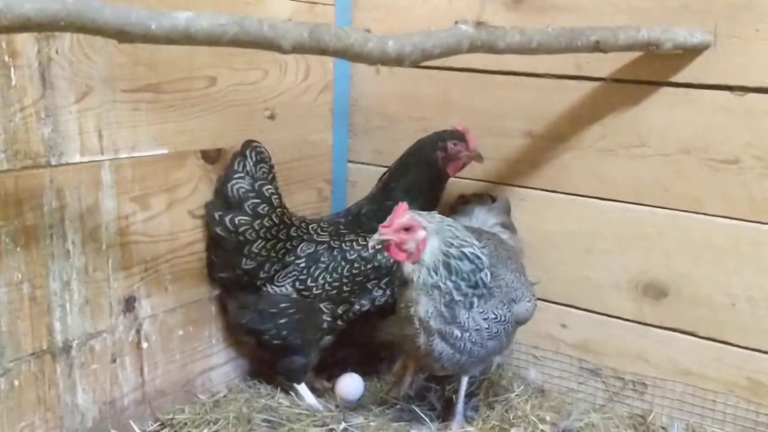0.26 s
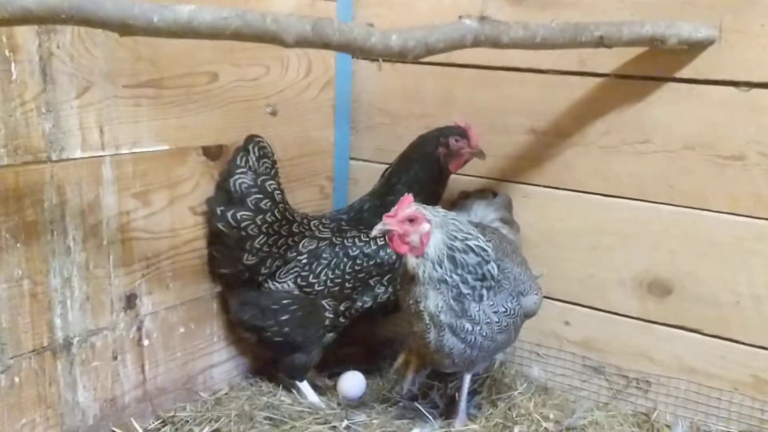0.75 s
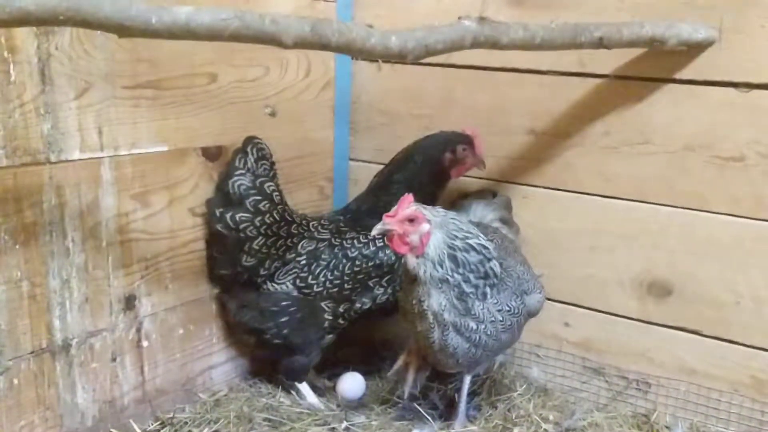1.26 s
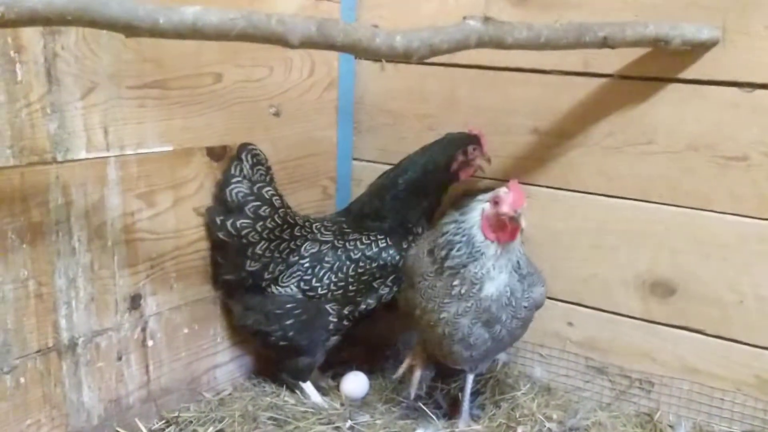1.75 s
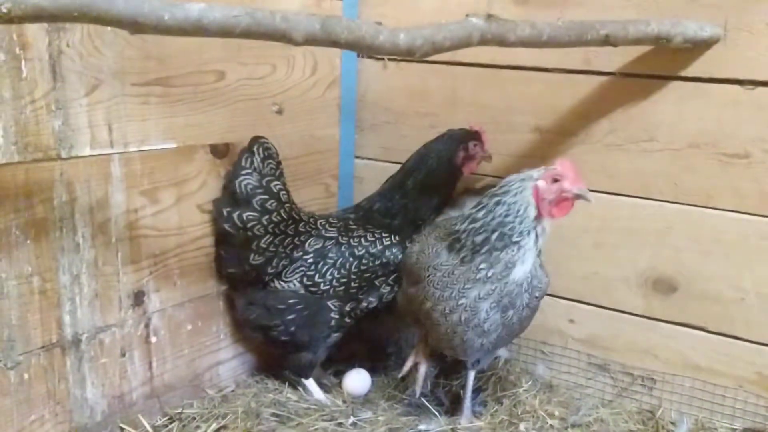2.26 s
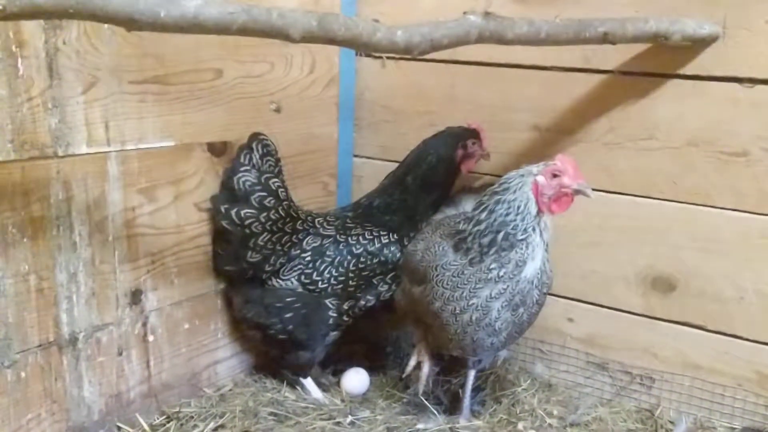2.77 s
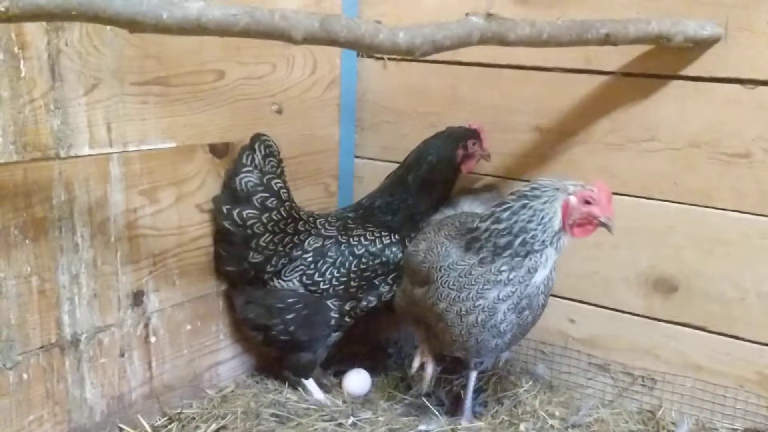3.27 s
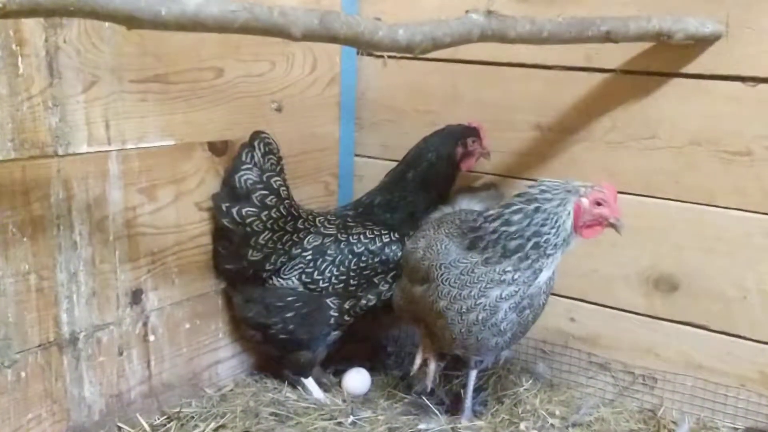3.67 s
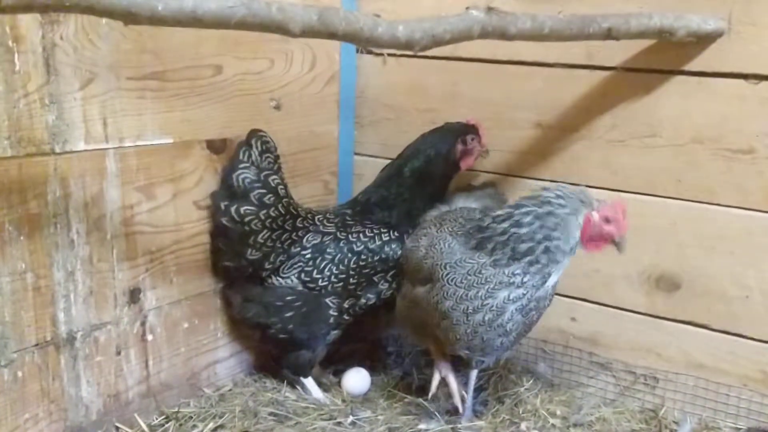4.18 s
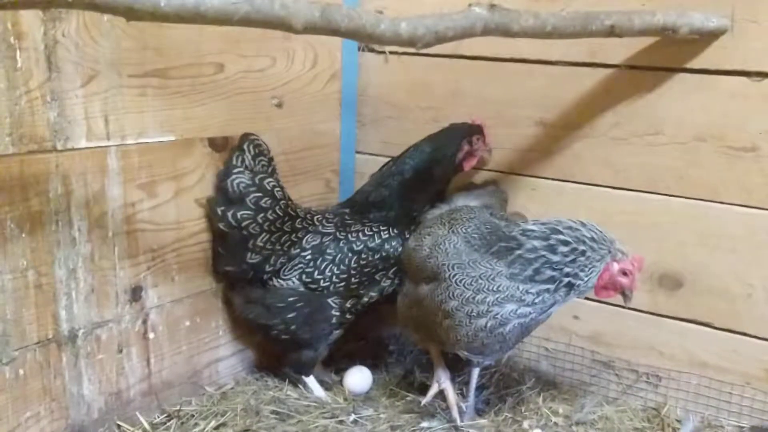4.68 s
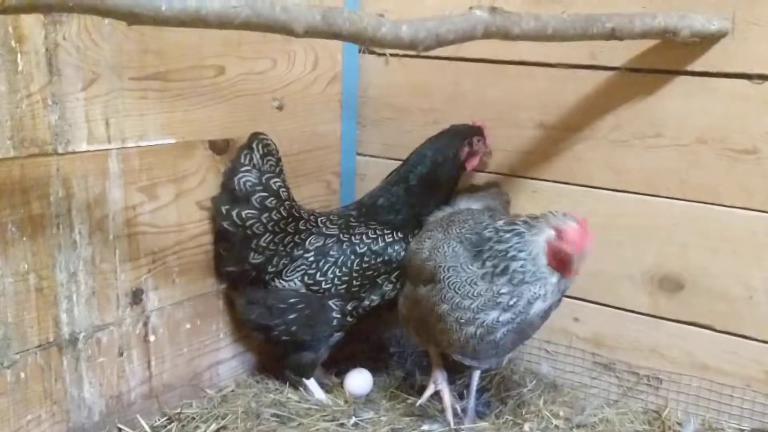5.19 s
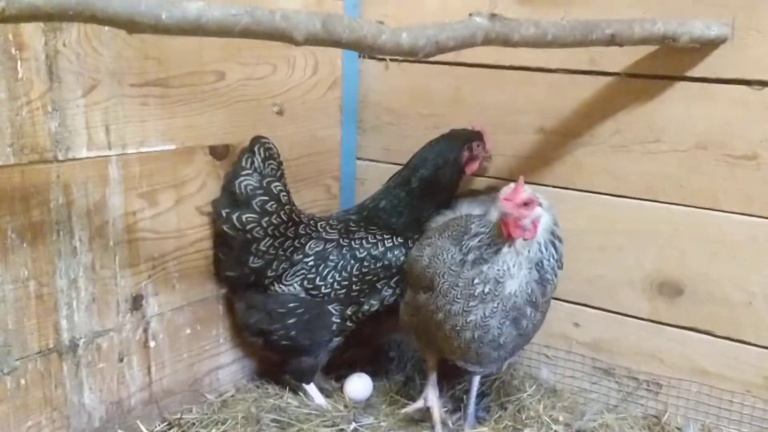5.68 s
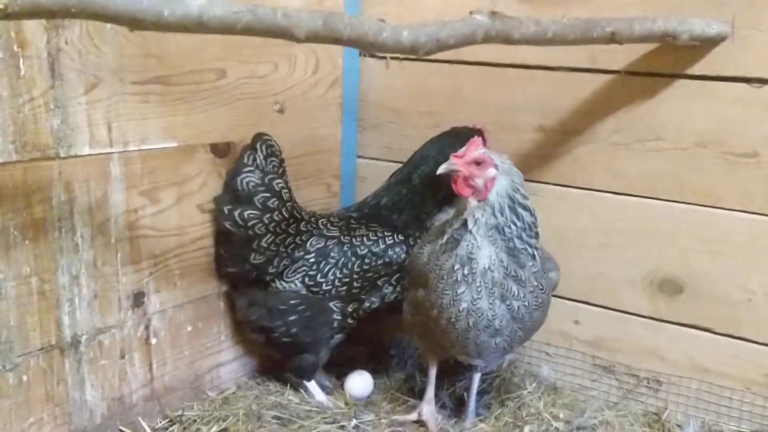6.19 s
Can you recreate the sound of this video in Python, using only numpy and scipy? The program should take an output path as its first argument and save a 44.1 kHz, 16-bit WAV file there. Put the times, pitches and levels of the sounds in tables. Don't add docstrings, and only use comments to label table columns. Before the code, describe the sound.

A small plank-walled hen coop, close camera sound, with low rumble and soft hiss throughout. At 0 s the echo of an earlier cackle dies away. From 0.25 to 1.2 s a second hen gives a small greeting and two soft, husky, wavering whines; a faint far peep sits at 0.5. A low cluck comes at 1.2, then a weak lead-in and loud higher cluck at 1.4. From 1.5 to 1.9 a loud, buzzy, nasal cackle holds, rises slightly and drops abruptly, its wooden echo blooming. The background dips under it, then swells back. Around 2.3-2.6 there is a straw step, dull feeder pecks and another peep. At 3.7 a pail tap and bright metallic peck ring quietly. Clucks at 3.95, 4.2 and 4.4, with a beak click, lead to the second loud cackle from 4.5 to 4.9. Its echo fades into quiet rumble and hiss until about 6.4 s.

```python
import sys
import numpy as np
from scipy import signal
from scipy.fft import rfft, irfft, next_fast_len
from scipy.io import wavfile
from scipy.ndimage import uniform_filter1d, map_coordinates

SR = 44100
rng = np.random.default_rng(int(sys.argv[2]) if len(sys.argv) > 2 else 0)


def undo_db(level):
    steps = np.asarray(level, float) / 20
    return 10 ** steps


def inscribe(sig):
    pcm = np.round(np.clip(np.atleast_2d(sig).T, -1, 1) * 32767)
    wavfile.write(sys.argv[1], SR, pcm.astype(np.int16))


N = 284004
T = np.arange(N) / SR

# (frequency [Hz], level per Hz [dB])
RUMBLE_COLOUR = [(12, -47), (20, -22), (41, -8.5), (59, 2), (75, -0.5), (200, -20.5), (260, -51),
                 (440, -120)]
HISS_COLOUR = [(88, -30.5), (150, -8), (358, -10.5), (460, -12.5), (704, -13), (888, -15.5), (1920, -19),
               (7020, -27), (8850, -27), (10100, -31), (15200, -31.5)]
# (frequency [Hz], level [dB])
ECHO_COLOUR = [(200, -8), (500, -3), (850, 10.5), (1100, -7), (2000, 5.5), (5000, 2.5), (10000, 10)]
# (frequency [Hz], decay time [s])
ECHO_DECAY = [(200, 0.93), (530, .45), (1100, 0.44), (3700, 0.33), (9700, 0.09)]
# (start [s], length [s], pitch [Hz], first harmonic [dB], second harmonic [dB])
PEEPS = [
    (.507, .06, 869, -68.5, -62),
    (2.63, 0.11, 891, -62, -66.5),
]
# (frequency [Hz], level [dB], decay time [s])
FEEDER_TONES = [(1119, 0, .9), (3190, 0, .35), (5510, -4, .15), (4735, -8, .1)]
PAIL_TONES = [(1200, -63.5, 0.13), (1250, -72, 0.26), (2550, -69.5, 0.092), (3630, -67.5, 0.084),
              (3220, -70, 0.076), (695, -77.5, 0.091)]
# (time [s], level [dB], extra above 4 kHz [dB])
PECKS = [
    (2.445, -79.5, -11),
    (2.581, -87.5, -14),
    (3.707, -78, 9.5),
]
# (time [s], level [dB], decay time [s], top frequency [Hz])
DRY_NOISES = [
    (4.445, -37, .002, 15000),
    (3.661, -66, .004, 5000),
    (2.34, -48, .08, 500),
    (1.91, -33, .09, 300),
    (4.865, -37, .09, 300),
]
# (time [s], pitch [Hz], level [dB])
GREETING = [
    (0.255, 497, -61.5),
    (0.297, 487, -58),
    (0.311, 680, -59),
    (0.33, 620, -69),
]
# (time [s], pitch [Hz], level [dB])
WHINES = [
    [(0.33, 815, -61.5), (0.368, 729, -60.5), (0.484, 769, -62), (0.51, 849, -64), (0.638, 726, -66.5),
     (0.668, 783, -56), (0.736, 797, -65), (0.804, 698, -55.5), (0.84, 696, -70)],
    [(0.878, 780, -64.5), (0.924, 706, -56), (0.946, 739, -65.5), (0.964, 777, -55), (0.978, 708, -57.5),
     (0.998, 755, -62.5), (1.1, 713, -54.5), (1.116, 710, -67.5), (1.168, 770, -56.5)],
]
# (start [s], length [s], last pitch [Hz], peak [dB], swell power)
CLUCKS = [
    (1.161, 0.051, 257.8, -34.5, 0.92),
    (1.398, 0.029, 229.7, -45.5, 0.77),
    (1.416, 0.052, 397.5, -30.5, 0.23),
    (3.962, 0.047, 263.4, -32.5, 0.53),
    (4.189, 0.058, 372.2, -30.5, 0.78),
    (4.414, .042, 333.3, -33, 1.2),
]
# (from [s], to [s], level beside the throat [dB])
HARD_EDGES = [
    (1.18, 1.201, -17),
    (1.407, 1.415, -19),
    (1.424, 1.47, -14.5),
    (3.971, 4.003, -20.5),
    (4.201, 4.246, -20.5),
    (4.423, 4.459, -20.5),
]
# (frequency [Hz], level [dB])
THROAT = [(88, -49.5), (150, -19.5), (310, -18.5), (561, -20.5), (714, -16.5), (866, -5), (1040, 0.5),
          (1170, -6), (1410, -22), (1790, -24), (1970, -20.5), (2170, -37.5), (2390, -29), (2700, -48.5),
          (3510, -75), (5940, -120)]
# (frequency [Hz], level [dB])
CLUCK_BEAKS = [
    [(1590, -41.5), (2700, -11.5), (3470, 2), (3900, -3), (4030, -19.5), (4340, -1.5), (5180, -0.5),
     (5870, -14.5), (6350, -4), (7580, -14.5), (9300, -10.5), (11000, -38.5), (13000, -32.5)],
    [(1590, -46.5), (2700, -21.5), (3040, -4), (3290, -5), (3420, 4.5), (4390, -22.5), (5350, 1.5),
     (5570, -10.5), (5910, -25), (6430, -14.5), (8700, -14.5), (10700, -37.5), (13000, -39.5)],
]
# (time [s], pitch [Hz])
PITCH_1 = [
    (1.526, 495.5),
    (1.55, 522.3),
    (1.636, 518.0),
    (1.642, 524.9),
    (1.81, 534.3),
    (1.886, 564.0),
    (1.896, 555.8),
    (1.914, 442.9),
    (1.925, 415.2),
]
PITCH_2 = [
    (4.507, 501.2),
    (4.535, 524.6),
    (4.649, 519.8),
    (4.755, 530.0),
    (4.833, 554.0),
    (4.845, 577.4),
    (4.865, 504.3),
    (4.885, 420.7),
    (4.9, 404.7),
]
# (time [s], second harmonic [dB], rise before [dB/s], sag after [dB/s])
PUSHES_1 = [
    (1.542, -22, 59, 497),
    (1.58, -26.5, 297, 329.5),
    (1.62, -27.5, 598.5, 700.5),
    (1.662, -22, 797.5, 171),
    (1.753, -23.5, 400.5, 42.5),
    (1.878, -25.5, 61.5, 270),
]
PUSHES_2 = [
    (4.517, -20.5, 60, 300),
    (4.586, -23.5, 70, 110),
    (4.714, -22.5, 170, 350),
    (4.768, -22, 250, 150),
    (4.846, -24.5, 110, 300),
]
# (frequency [Hz], level [dB])
WIDE = [(1180, -53.5), (2000, -17), (2640, -25.5), (2820, -38.5), (3060, -9.5), (3170, 6), (3410, -22.5),
        (3640, -9), (4440, -39), (5330, -2.5), (6000, -28.5), (6360, -13.5), (6690, -32), (8970, -31.5),
        (11500, -81), (15000, -92), (22000, -120)]
HALF_OPEN = [(1180, -38), (2000, -10.5), (2400, -12), (2570, 2.5), (2700, -10.5), (3220, -4.5), (3950, -14),
             (4540, -6.5), (4990, -7.5), (5370, -1), (5950, -9.5), (6400, -2.5), (7800, -18.5),
             (9100, -16.5), (11500, -57), (15000, -77), (22000, -120)]
NEARLY_CLOSED = [(1180, -21), (2000, 1), (2330, 4), (2600, -17.5), (3310, -8), (3510, -18), (3810, -11),
                 (4550, 1.5), (4900, -32), (5370, -16), (6220, -2), (7250, -27), (8330, -16.5),
                 (9580, -29.5), (11500, -53), (15000, -80), (22000, -120)]
# (first harmonic [dB], third [dB], all upper ones [dB])
HARMONIC_BALANCE = [
    (-45.5, -48, -32),
    (-46, -40.5, -39.5),
    (-40.5, -43.5, -38.5),
]
# (frequency [Hz], level [dB])
LEAK_COLOUR = [(300, -50), (750, -14), (1100, -5), (1400, -15), (1850, -40), (2350, -5), (2880, -46),
               (3450, -9), (3950, -26), (4600, -3), (4950, -22), (5500, -3), (6900, -16), (9500, -16),
               (11000, -45)]


def unit(x):
    return x / np.sqrt(np.mean(x ** 2) + 1e-20)


def along(points, hz):
    f, v = np.transpose(points)
    return np.interp(np.log(hz + 1), np.log(f + 1), v)


def wobble(rate, size=N):
    knots = rng.standard_normal(int(size * rate / SR) + 4)
    return map_coordinates(knots, [np.arange(size) * rate / SR])


def curves(rows):
    s, *cols = np.transpose(rows)
    t = np.arange(s[0], s[-1], 1 / SR)
    return round(s[0] * SR), t - s[0], [np.interp(t, s, c) for c in cols]


def gate(t, attack, release):
    return np.clip(np.minimum(t / attack, (t[-1] - t) / release), 0, 1)


def phase(hz):
    return 2 * np.pi * np.cumsum(hz) / SR


def coloured(x, spectrum):
    m = 2 * next_fast_len(len(x) // 2 + 4096)
    gain = undo_db(along(spectrum, np.fft.rfftfreq(m, 1 / SR)))
    c = irfft(np.log(np.maximum(gain, 1e-6)), m)
    c[1:m // 2] *= 2
    c[m // 2 + 1:] = 0
    return irfft(rfft(x, m) * np.exp(rfft(c)), m)[:len(x)]


def add(track, at, x):
    track[at:at + len(x)] += x[:len(track) - at]


def ring(tones, t, bright_db=0):
    out = 0
    for hz, db, decay_s in tones:
        level_db = db + bright_db * (hz > 4000) - 60 * t / decay_s
        out = out + undo_db(level_db) * np.sin(2 * np.pi * hz * t)
    return out


def background(loud):
    level_db = 10 * np.log10(np.abs(uniform_filter1d(loud ** 2, size=4000)) + 1e-9)
    over_db = np.maximum(level_db + 39, 0)

    def held(s):
        return signal.lfilter([1 / (s * SR)], [1, 1 / (s * SR) - 1], over_db)

    rumble_db = -65.5 - 0.7 * held(0.035) + 0.26 * held(0.7) + 0.54 * wobble(3)
    rumble = unit(coloured(rng.standard_normal(N), RUMBLE_COLOUR)) * undo_db(rumble_db)
    hiss = unit(coloured(rng.standard_normal(N), HISS_COLOUR)) * undo_db(-70 + 0.2 * wobble(2.6))
    return rumble + hiss * undo_db(-0.55 * over_db)


def earlier_call():
    colour = [(500, -22), (800, 22.5), (1150, 22.5), (1500, -48), (3000, -22.5)]
    return undo_db(-60.5 - 60 * T / 0.5) * unit(coloured(rng.standard_normal(N), colour))


def coop(x):
    hz, t, z = signal.stft(rng.standard_normal(SR * 3 // 4), SR, nperseg=256)
    tail_db = along(ECHO_COLOUR, hz)[:, None] - 60 * t / along(ECHO_DECAY, hz)[:, None]
    tail = signal.istft(z * undo_db(tail_db), SR, nperseg=256)[1]
    late = np.pad(x, (180, 0))
    return signal.fftconvolve(late, tail / np.linalg.norm(tail))[:N]


def far_peeps():
    out = np.zeros(N)
    for s, length, hz, first_db, second_db in PEEPS:
        t = np.arange(0, length, 1 / SR)
        turn = phase(hz - 234 * t)
        overtones = np.sin(2 * turn) + 0.07 * np.sin(5 * turn)
        tone = undo_db(first_db - 60 * t) * np.sin(turn)
        tone = tone + undo_db(second_db) * np.clip(t / length * 3, 0, 1) * overtones
        add(out, round(s * SR), 1.6 * tone * gate(t, 0.02, 0.03))
    return out


def feeder_and_pail():
    out = np.zeros(N)
    t = T[:SR // 2]
    for s, db, bright_db in PECKS:
        add(out, round(s * SR), undo_db(db + 11) * ring(FEEDER_TONES, t, bright_db) * (1 - np.exp(-t / 0.0076)))
    add(out, round(3.66 * SR), undo_db(10) * ring(PAIL_TONES, t) * (1 - np.exp(-t / 0.0024)))
    return out


def dry_noises():
    out = np.zeros(N)
    t = T[:SR // 2]
    for s, db, decay_s, top_hz in DRY_NOISES:
        puff = undo_db(db - 60 * t / decay_s) * rng.standard_normal(len(t))
        colour = [(110, -24), (220, 0), (top_hz, 0), (3 * top_hz, -30)]
        add(out, round(s * SR), coloured(puff, colour))
    return out


def second_hen():
    out = np.zeros(N)
    for rows, overtone_db in [(GREETING, -11)] + [(whine, -16) for whine in WHINES]:
        at, t, (hz, db) = curves(rows)
        shake = 0.011 * wobble(40, len(t)) + 0.04 * wobble(200, len(t))
        turn = phase(hz * (1 + shake))
        tone = np.sin(turn) + undo_db(overtone_db - 2.7 * (hz > 520)) * np.sin(2 * turn)
        level = undo_db(db + 3 + 1.5 * wobble(70, len(t)))
        add(out, at, level * gate(t, 0.004, 0.012) * tone)
    return out


def clucks():
    out = np.zeros(N)
    for (s, length, last_hz, db, swell), (start, end, hard_db) in zip(CLUCKS, HARD_EDGES):
        t = np.arange(0, length, 1 / SR)
        u = t / length
        climb = 0.74 + 0.26 * np.sin(np.pi / 2 * np.clip(1.3 * u, 0, 1))
        hz = last_hz * climb * (1 + 0.031 * wobble(150, len(t)))
        turn = phase(hz)
        k = np.arange(1, 56)[:, None]
        pulses = unit(np.sum((k * hz < 14000) * np.cos(k * turn), axis=0))
        puffs = unit(np.cos(turn / 2 - 0.5) ** 6 * rng.standard_normal(len(t)))
        edge = np.clip(np.minimum((t + s - start) / 0.001, (end - s - t) / 0.0044), 0.08, 1)

        def ringing(x, tract):
            padded = np.pad(x * gate(t, 0.009, 0.014), (0, 2048))
            return np.sqrt(1 + 2048 / len(t)) * unit(coloured(padded, tract))

        beak = CLUCK_BEAKS[int(last_hz > 300 or db < -40)]
        low = ringing((pulses + 0.55 * puffs) * u ** swell, THROAT)
        high = ringing((pulses + 0.9 * puffs) * edge * u ** (swell / 2), beak)
        add(out, round(s * SR), undo_db(db - 5.5) * (low + undo_db(hard_db) * high))
    return out


def upper_harmonics(hz, beak):
    k = np.arange(4, 29)[:, None]
    level_db = 0
    for i, shape in enumerate((WIDE, HALF_OPEN, NEARLY_CLOSED)):
        share = np.clip(1 - abs(beak - i), 0, 1)
        level_db = level_db + share * np.maximum(along(shape, k * hz), -49)
    level = undo_db(level_db + 2.5 * np.array([wobble(70, len(hz)) for _ in k]))
    return k, level / np.linalg.norm(level, axis=0)


def cackle(pitch, pushes, beak_s, wide_db, third_db, rasp_db, notch_db):
    at, t, (hz,) = curves(pitch)
    size = len(t)
    push_s, peak, rise, sag = np.array(pushes).T[:, :, None]
    since = t + at / SR - push_s
    second = np.max(peak - np.where(since < 0, -rise, sag) * since, axis=0)
    fade = 308.5 * np.maximum(since[-1] - 0.025, 0)

    beak = np.interp(t + at / SR, beak_s, [0, 1, 1, 2])
    first, third, bright = (np.interp(beak, range(3), c) - fade for c in np.transpose(HARMONIC_BALANCE))
    wide = np.clip(1 - beak, 0, 1)
    highest_hz = np.maximum.accumulate(hz)
    first = first - notch_db * np.exp(-((highest_hz - 536) / 5) ** 2)
    third = third + third_db * wide + 1.6 * wobble(30, size)
    bright = bright + wide_db * wide

    rasp = undo_db(rasp_db) + np.sum(undo_db(peak - 24) * np.exp(-(since / 0.015) ** 2), axis=0)
    rasp = rasp + undo_db(-34 - 301 * t)
    rasp = rasp + undo_db(-43.5 - fade) * np.clip(beak - 1, 0, 1) ** 2
    slack = np.clip((highest_hz - hz - 12) / 40, 0, 1)
    roughness = 0.5 * np.minimum(rasp, undo_db(-49)) + 0.09 * slack
    shake = 0.003 * wobble(90, size) + roughness * wobble(300, size)
    turn = phase(hz * (1 + shake))

    k, upper = upper_harmonics(hz, beak)
    tone = undo_db(first) * np.sin(turn) + undo_db(second) * np.sin(2 * turn) + undo_db(third) * np.sin(3 * turn + 1)
    tone = tone + undo_db(bright - 8.7 * slack) * np.sum(upper * np.sin(k * turn + 0.23 * k * k), axis=0)
    leak = unit(coloured(rng.standard_normal(size), LEAK_COLOUR) * (1 + 0.5 * np.sin(turn)))
    out = np.zeros(N)
    add(out, at, gate(t, 0.004, 0.01) * (np.sqrt(2) * tone + undo_db(-2) * rasp * leak))
    return out


def scene():
    # wide until, half open from, closing from, nearly closed [s]
    cackles = [
        cackle(PITCH_1, PUSHES_1, beak_s=(1.59, 1.64, 1.8, 1.87),
               wide_db=-1, third_db=-5.5, rasp_db=-49.5, notch_db=14.5),
        cackle(PITCH_2, PUSHES_2, beak_s=(4.56, 4.66, 4.75, 4.82),
               wide_db=-5.5, third_db=6, rasp_db=-57, notch_db=5.5),
    ]
    short_calls = clucks()
    calling = sum((T > p[0][0]) & (T < p[-3][0]) for p in (PITCH_1, PITCH_2))
    bloom = undo_db(-11 * uniform_filter1d(calling * 1.0, size=1500))
    hen = sum(call + undo_db(-4.5) * bloom * coop(call) for call in cackles)
    hen = hen + short_calls + undo_db(-5.5) * coop(short_calls)
    others = second_hen() + far_peeps() + feeder_and_pail() + dry_noises()
    others = others + undo_db(-12.5) * coop(others) + earlier_call()
    return (hen + others + background(hen))[None]


def top_cut(x):
    return signal.sosfilt(signal.butter(12, 15740, fs=SR, output="sos"), x)


def record(dry):
    return top_cut(dry)


dry = scene()
out = record(dry)
inscribe(out)
```